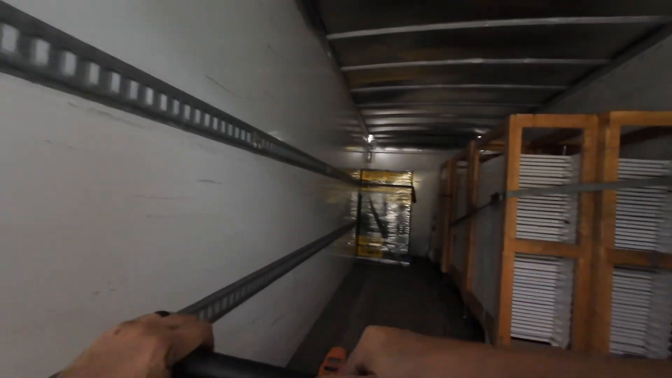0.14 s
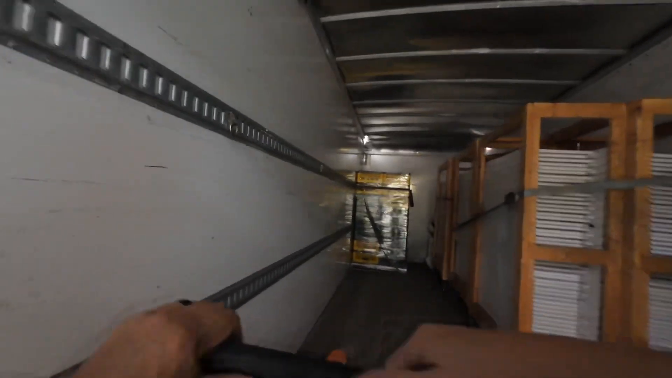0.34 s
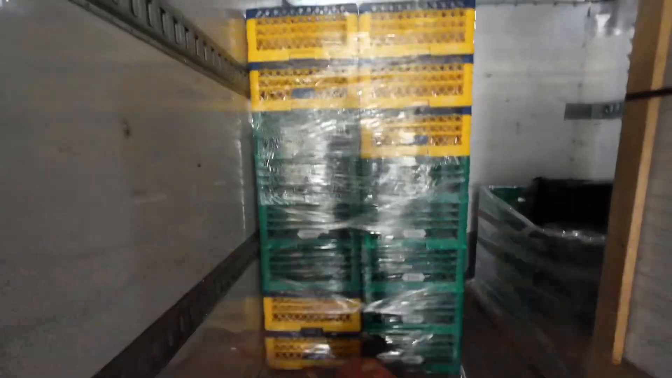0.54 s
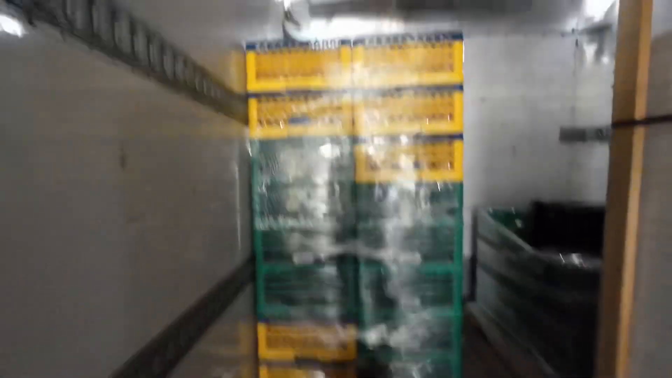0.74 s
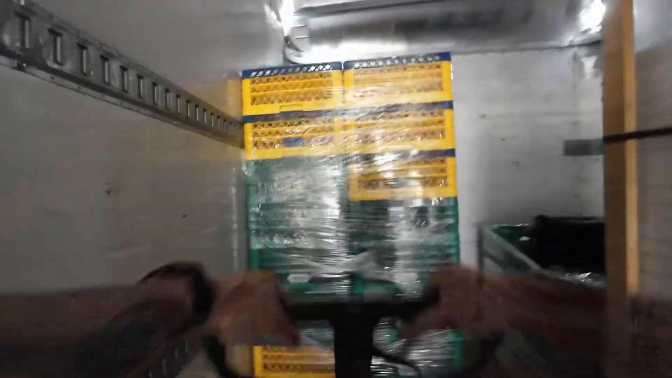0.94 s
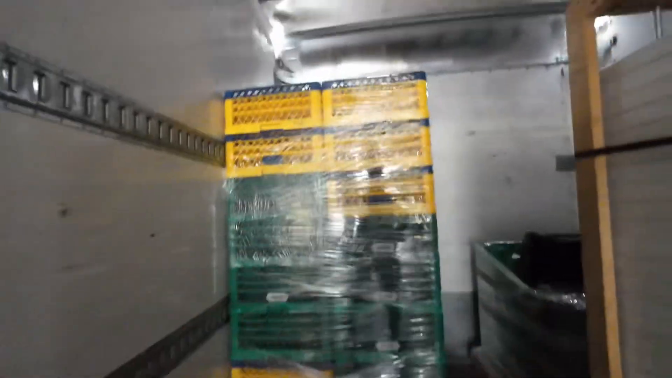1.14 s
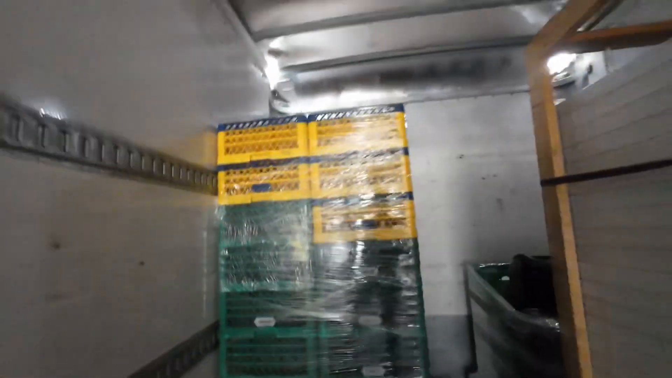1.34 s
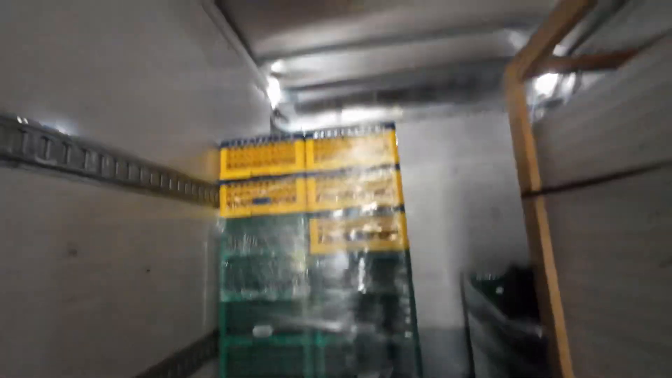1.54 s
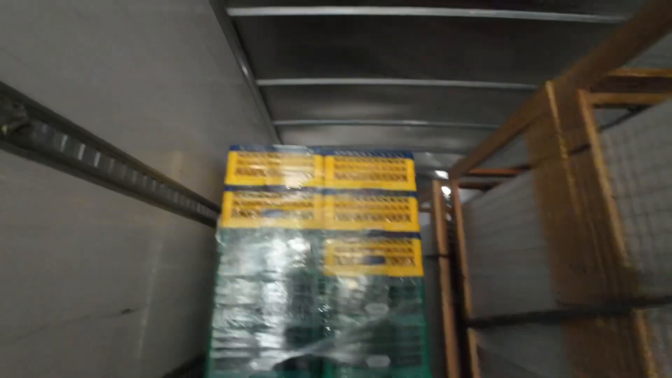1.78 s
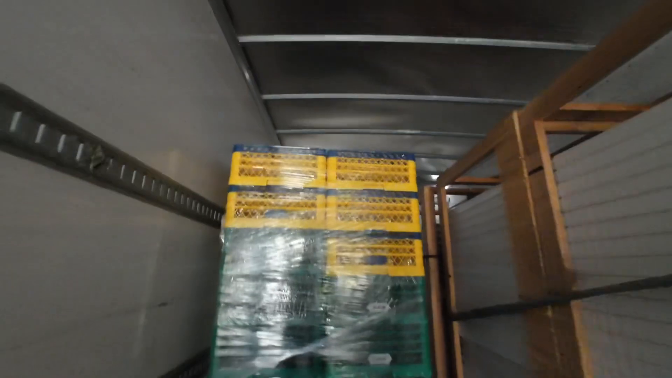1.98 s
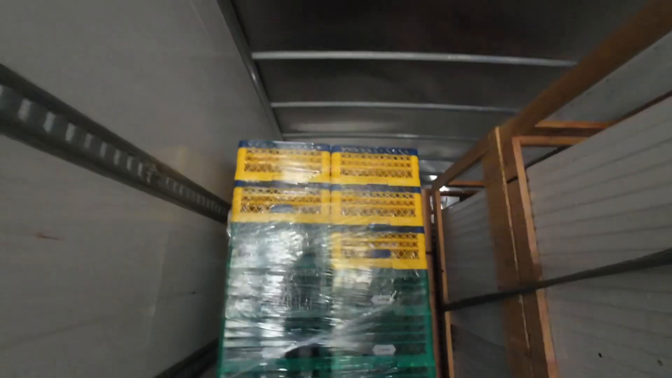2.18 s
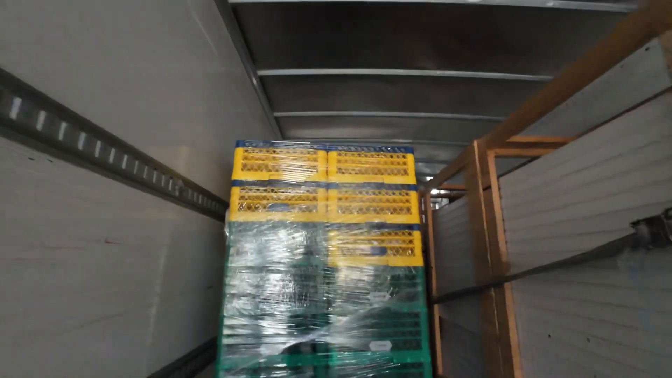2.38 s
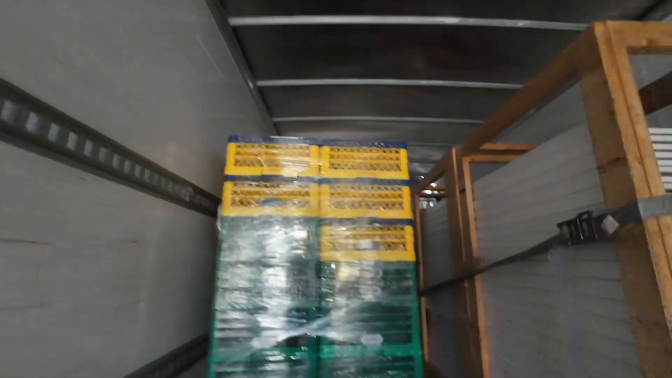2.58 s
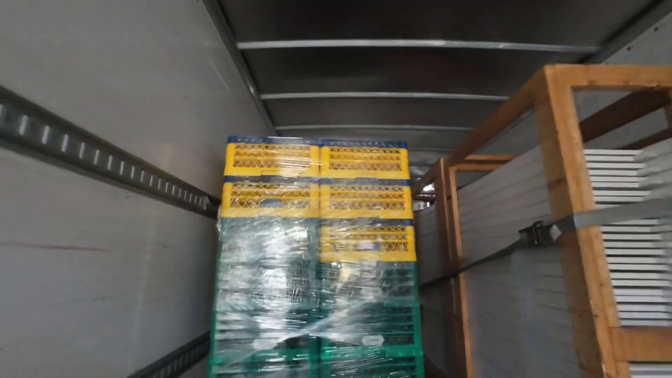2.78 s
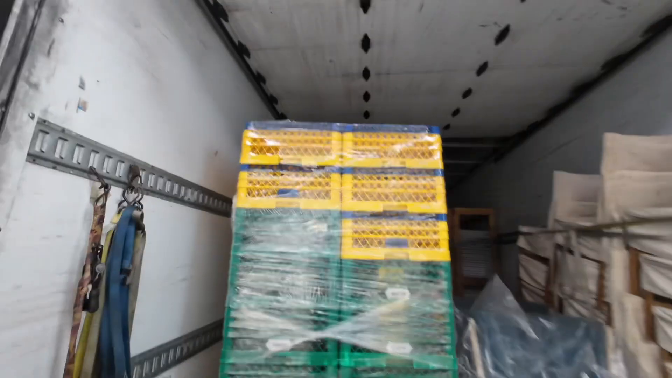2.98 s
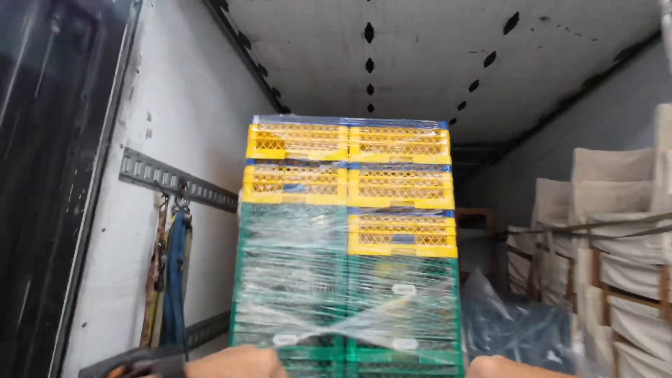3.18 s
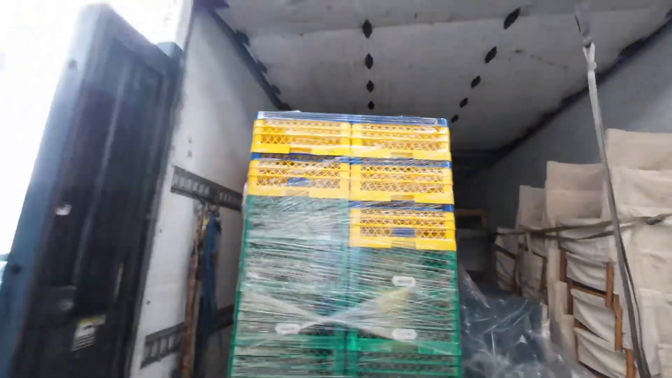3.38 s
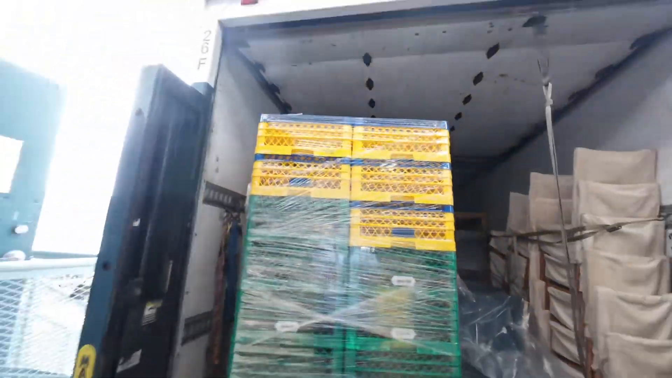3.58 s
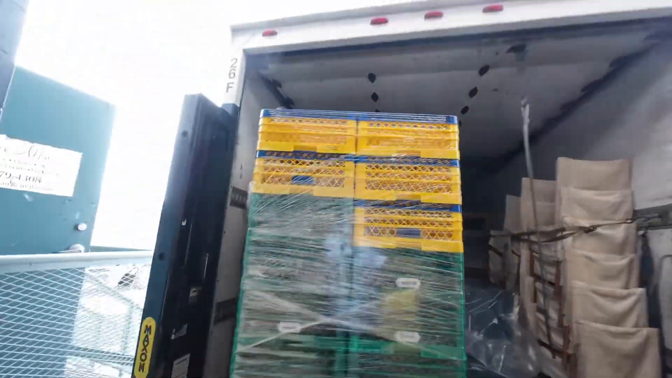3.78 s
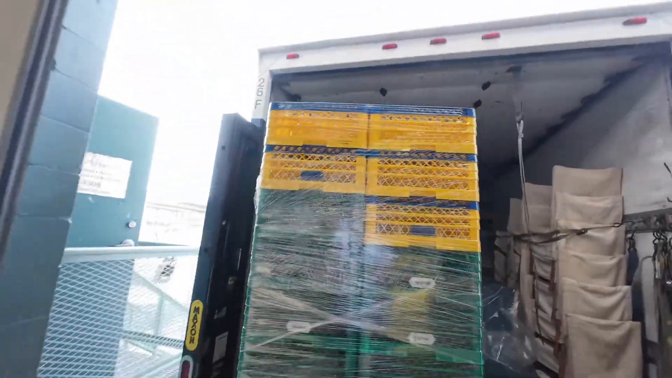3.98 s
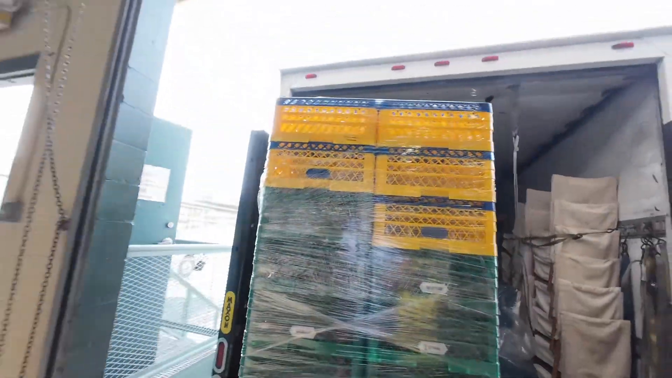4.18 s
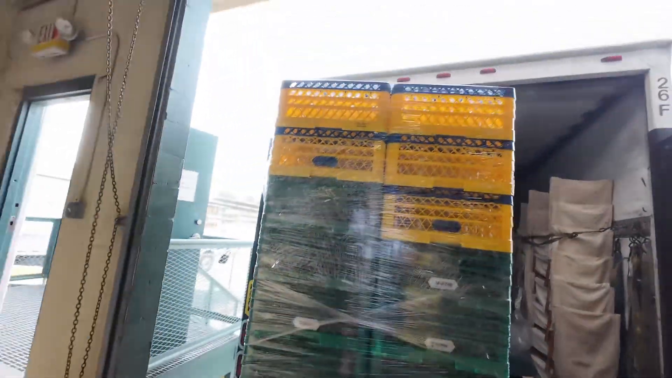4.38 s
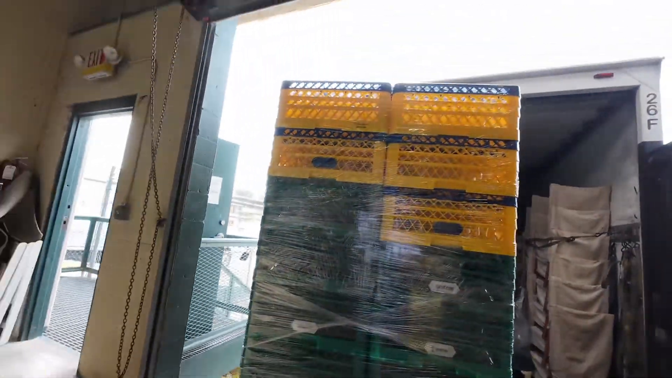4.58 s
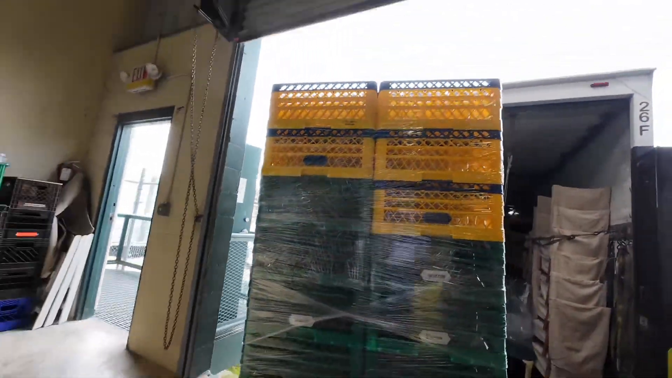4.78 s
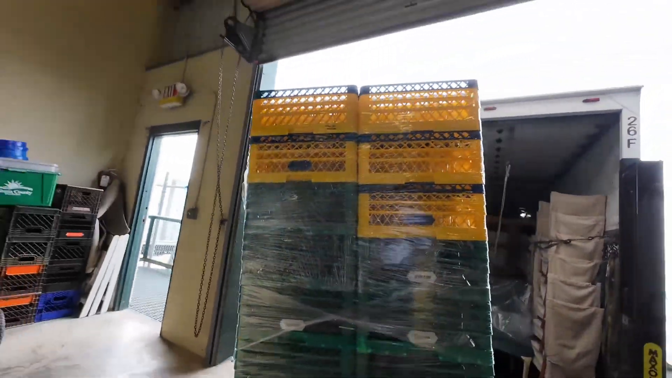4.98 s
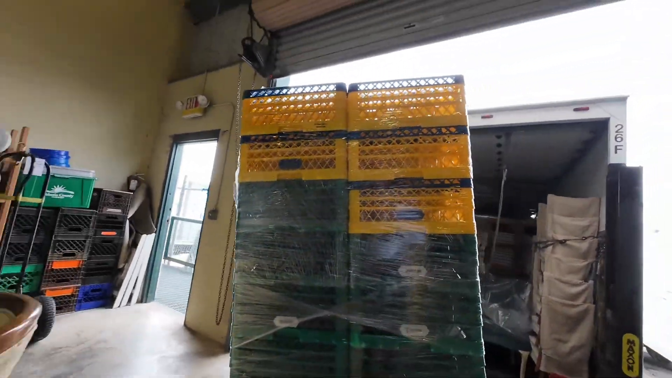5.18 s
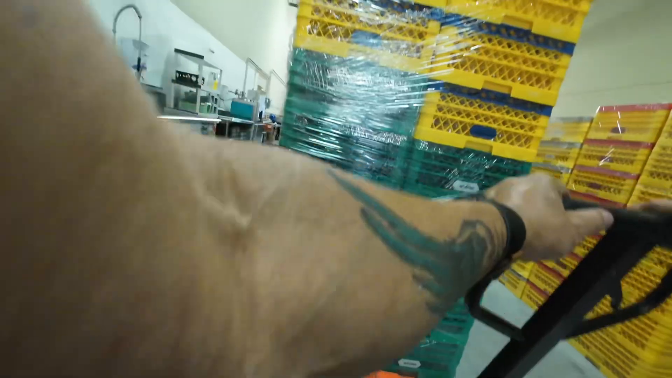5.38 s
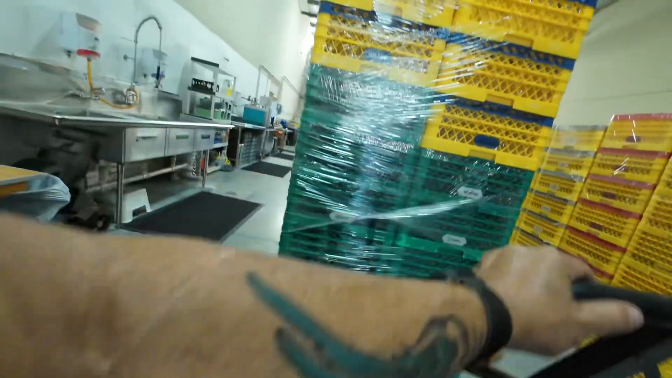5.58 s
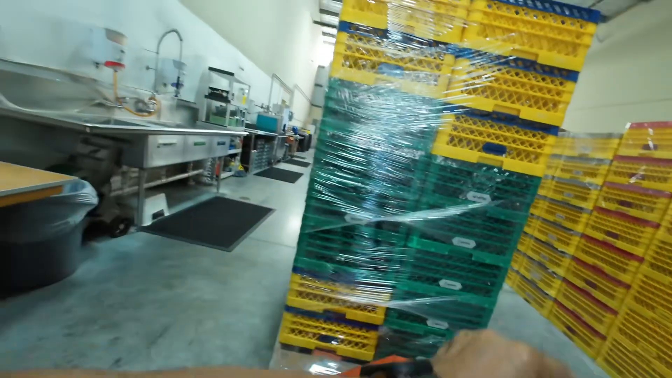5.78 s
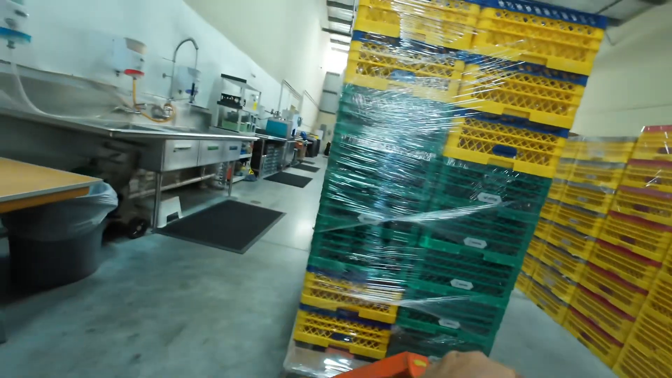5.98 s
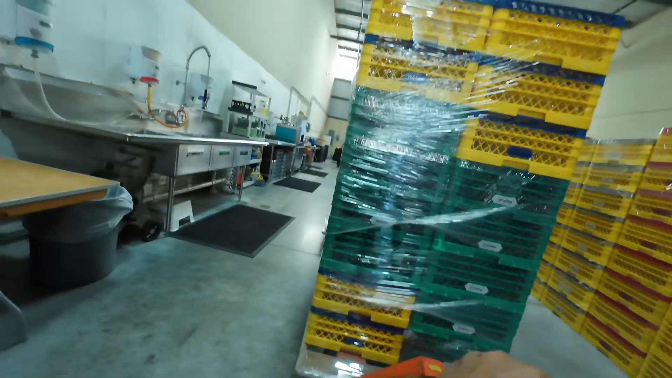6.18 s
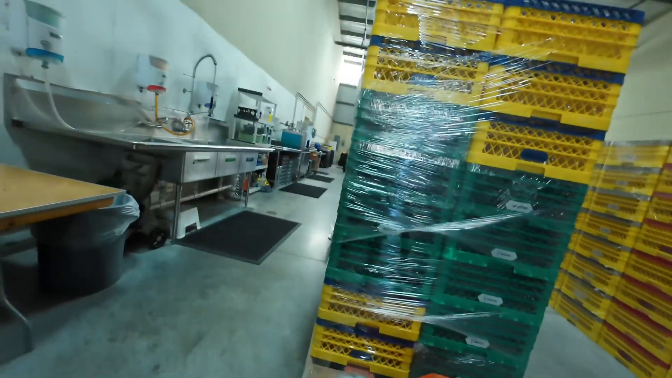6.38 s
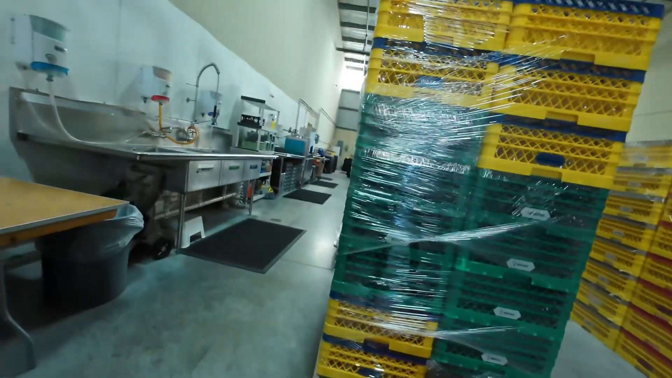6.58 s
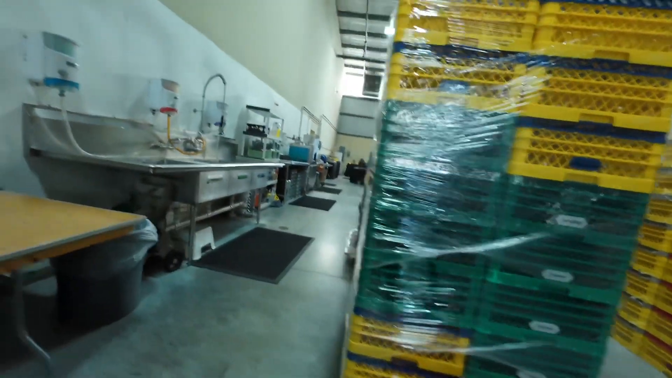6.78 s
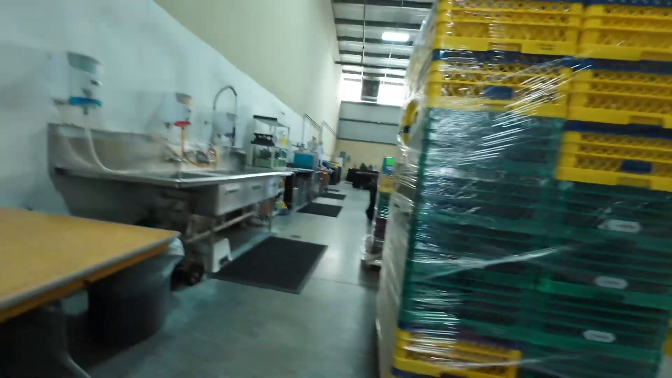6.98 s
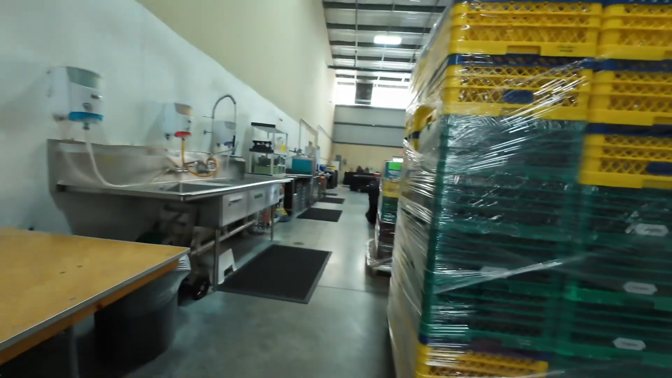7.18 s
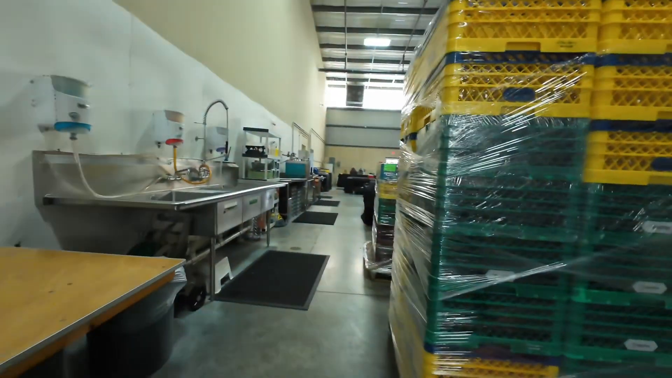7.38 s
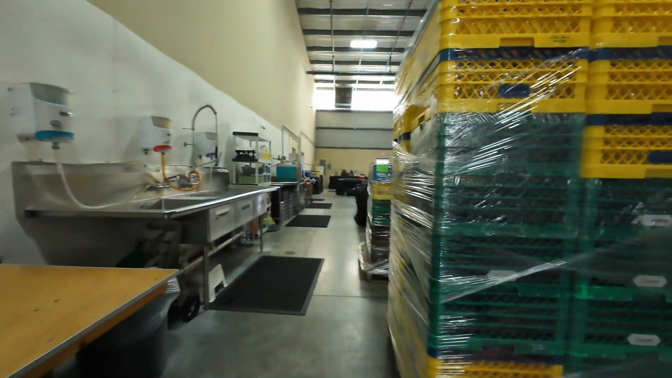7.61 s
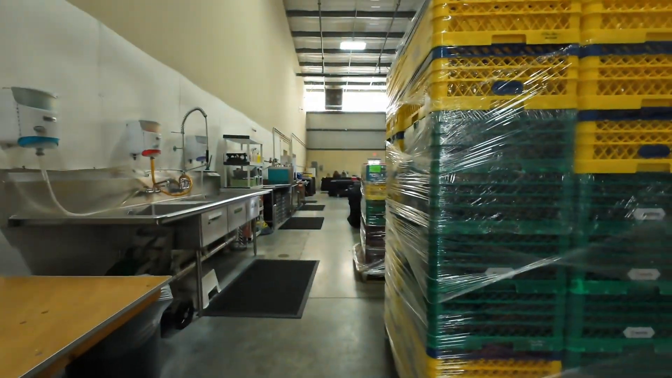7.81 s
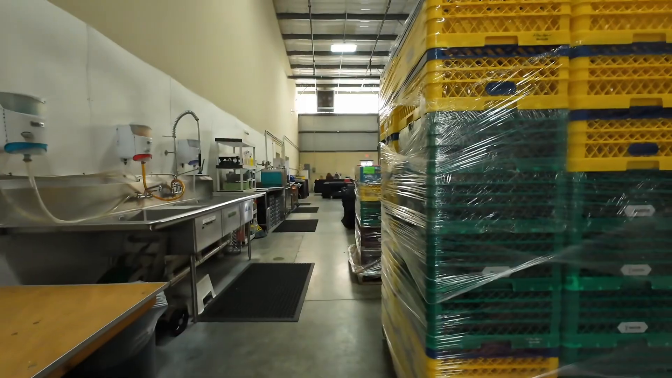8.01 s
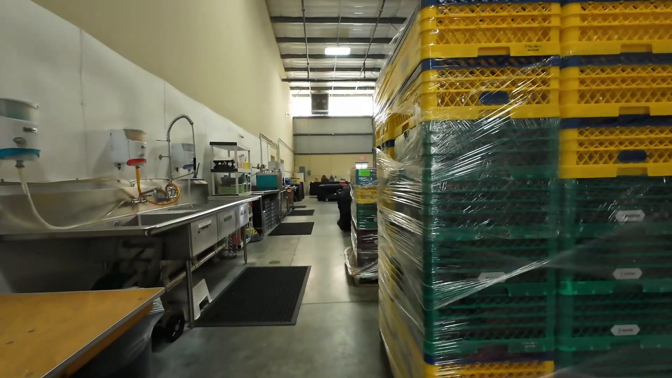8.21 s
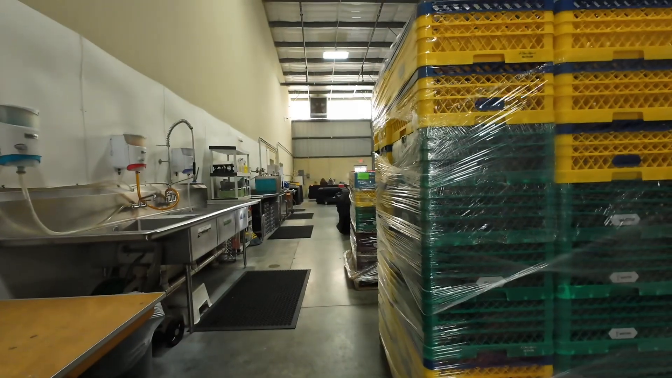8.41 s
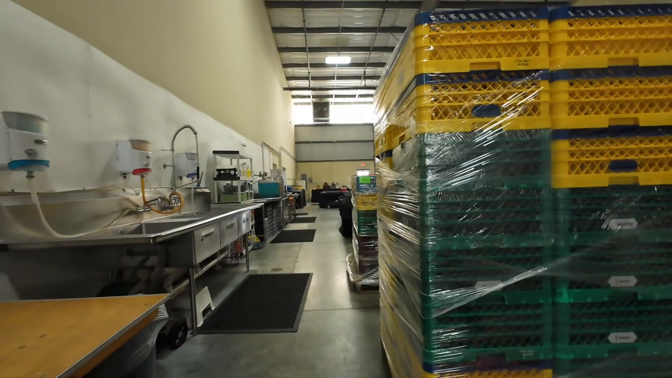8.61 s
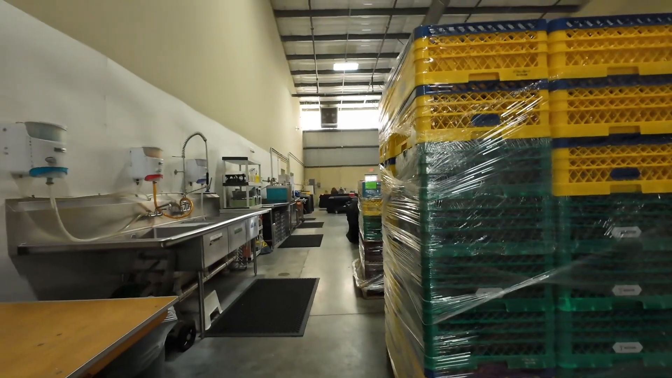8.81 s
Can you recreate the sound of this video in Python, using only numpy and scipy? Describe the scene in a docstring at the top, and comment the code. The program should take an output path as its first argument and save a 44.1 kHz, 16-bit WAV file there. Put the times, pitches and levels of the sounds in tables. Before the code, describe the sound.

Body-worn microphone, abrupt cuts between moments. Hollow wheel rumble and ringing steel inside a box truck, muffled thumps and shuffling, then a violent slam and heavy rattling roll across truck bed and dock plate, the treble dulling outside. The noise stops dead; in a roomy warehouse there are stretched plastic creaks, a low groan, cloth rustle, wind puffs, thin squeaks and closing clunks.

```python
"""Pallet jack from truck to warehouse

A manual pallet jack rumbles through a box truck, clanks under a pallet of wrapped plastic crates and
hauls it over the dock plate: shaped noise and random contacts roll, decaying noise and modes clank and thud.
In the quiet warehouse the load creaks by stick-slip, low noise buffets the microphone, gliding tones squeak
at the wheels and the jack knocks again over a soft ventilation drone."""
import sys
import numpy as np
from scipy import signal
from scipy.fft import rfft, irfft, next_fast_len
from scipy.io import wavfile
from scipy.ndimage import uniform_filter1d, map_coordinates

SR = 44100
rng = np.random.default_rng(int(sys.argv[2]) if len(sys.argv) > 2 else 0)


def unload_audio(sound):
    """Save the sound as a 16-bit wav file, at the path given as the first command line argument."""
    columns = np.transpose(np.atleast_2d(sound))
    # keep every value between -1 and 1, then stretch to whole-number steps
    steps = np.round(np.clip(columns, -1, 1) * 32767)
    wavfile.write(sys.argv[1], SR, steps.astype(np.int16))


N = 390285
TIME = np.arange(N) / SR
TOP_HZ = 15750  # top of the audible band

# moments at which the events still sounding are cut off: time [s]
CUTOFFS = [.42, 1.633, 2.982, 5.33]
# resonances of the jack's deck: (frequency [Hz], width [Hz], level [dB])
DECK = [(180.3, 41, 2), (285, 137, -0.5), (433, 59, 2), (489, 45, 1.5), (622, 74, -1.5), (739, 57, -6.5),
        (880, 273, -14.5)]
# colour of fine metallic jingling: (frequency [Hz], density [dB per Hz])
JINGLE = [(3530, -1.5), (6000, 0.5), (7180, -7.5), (7810, 0), (8940, -6), (9880, -1.5), (11000, -10.5),
          (13300, -3), (15600, -18)]
# how hard the wheels drum, running in empty: (time [s], effort [dB])
EMPTY_RUN = [(0.0, -14), (0.176, -15.5), (0.26, -18)]


def rolling():
    """Hard wheels drum on the floor and shake every loose part of the jack."""
    # colours of the floor, drumming and loose frame: (frequency [Hz], density [dB per Hz])
    floor_colour = [(11, -30), (18, 4.5), (45, 2.5), (81, 5.5), (110, -8.5), (150, -11.5), (200, -18),
                    (330, -120)]
    drum_colour = [(59, -40), (100, -1.5), (129, -1.5), (192, -2.5), (344, -2.5), (474, -7), (646, -21),
                   (962, -18.5), (1400, -23.5), (1820, -29), (3080, -120)]
    rattle_colour = [(470, -13), (800, 1), (1300, -9.5), (1630, -7), (3110, -9.5), (5240, -21.5),
                     (7200, -26), (8000, -50), (10400, -49.5), (17600, -120)]

    rumble, drum, rattle, jingle = shaking()
    floor = coloured(rng.standard_normal(N), floor_colour)

    bumps = ringing(contacts(rate=400, spread_db=2.5), t60=0.37, wet_db=-0.5)
    deck_ring = resonant(contacts(rate=500, spread_db=5.5), DECK)
    deck_ring = coloured(deck_ring, [(900, -21), (3500, -14), (9000, -32)])
    deck = unit(coloured(bumps, drum_colour) + amp(-3.5) * deck_ring)

    chatter = amp(1.3 * wobble(29.87))  # loose parts jump about in clusters
    knocks = knocking(rate=130, t60=.05)
    shakes = ringing(contacts(rate=190, spread_db=5.0), t60=0.3, wet_db=16.5)
    frame = coloured(knocks + shakes, rattle_colour)
    pins = coloured(ringing(contacts(rate=480, spread_db=9.0), t60=0.28, wet_db=8.0), JINGLE)
    return rumble * floor + drum * hollow_floor(deck) + chatter * (rattle * frame + jingle * pins)


def shaking():
    """Gains of rumble, drumming, rattle and jingle: they follow the effort, and jolts stir up all but drumming."""
    # hauling the load out: (time [s], effort [dB])
    loaded_run = [(1.65, -31.5), (1.76, -27), (1.85, -22), (1.97, -20.5), (2.18, -27.5), (2.4, -29.5),
                  (2.83, -23.5), (3.22, -27), (3.92, -16.5), (4.03, -21.5), (4.31, -18.5), (4.9, -22.5),
                  (5.19, -33.5), (5.3, -37)]
    # jolts to bed and loose parts: (time [s], sway [dB], frame rattle [dB], fine jingle [dB])
    jolts = [(0.0, -18.5, -31, -34), (0.21, -15, -29.5, -60), (1.77, -19.5, -17, -30.5),
             (1.9, -17.5, -24, -33.5), (2.07, -22.5, -53, -34.5), (2.56, -40, -28, -46),
             (2.72, -45, -37, -31), (2.985, -9, -83, -72), (3.28, -9, -32.5, -49), (3.37, -36, -27, -36),
             (3.44, -25, -25.5, -44), (3.861, -17.5, -21, -34), (4.28, -29, -20.5, -33.5),
             (4.814, -29.5, -21.5, -53), (5.284, -39, -53.5, -32.5)]
    # how each shaking builds up and settles: (rise [s], t60 [s])
    swaying = (0.031, 1.34)
    rattling = (0.011, 1.18)
    jingling = (0.018, 1.4)
    drum_db, rumble_db, rattle_db, jingle_db = 1, -2.5, -22, -29  # each layer over the effort

    empty = curve(EMPTY_RUN) * (TIME < CUTOFFS[0])
    loaded = curve(loaded_run) * ((TIME > CUTOFFS[1]) & (TIME < CUTOFFS[-1]))
    effort = amp(-4.5) * empty + loaded
    # only a loaded jack keeps the truck bed rumbling
    bed = loaded * amp(rumble_db) * distance_gain(fade_db_per_s=6)

    times, sway_jolts, rattle_jolts, jingle_jolts = np.transpose(jolts)
    rumble = np.hypot(bed, surges(times, sway_jolts, swaying))
    rattle = np.hypot(effort * amp(rattle_db), surges(times, rattle_jolts, rattling))
    jingle = np.hypot(effort * amp(jingle_db), surges(times, jingle_jolts, jingling))
    return rumble, effort * amp(drum_db), rattle, jingle


def knocking(rate, t60):
    """Loose things knock together at random, each contact with a click and short resonances of its own; rms 1."""
    # lowest and highest resonance of loose crates and fittings: (frequency [Hz], frequency [Hz])
    knock_range = (450, 5500)
    out, t = np.zeros(N), np.arange(SR // 12) / SR
    for when, strength, *modes in rng.random((int(rate * N / SR), 20)):
        hz = np.interp(modes, [0, 1], knock_range)[:, None]
        ring = np.sum(np.sin(2 * np.pi * hz * t), axis=0) * amp(-60 * t / t60)
        click = 4 * rng.standard_normal(len(t)) * amp(-60 * t / .02)
        onset = 1 - np.exp(-t / .0005)
        add(out, when * N / SR, amp(12 * strength) * (ring + click) * onset)
    return unit(out)


def hollow_floor(deck):
    """The truck bed and dock plate boom; on solid concrete the low drumming weakens."""
    boom = filtered(deck, lambda hz: 1 / (1 + (hz / 330) ** 6))
    return deck - 0.49 * on_concrete() * boom


def on_concrete():
    """0 on the truck bed and dock plate, 1 on the warehouse floor."""
    concrete_s, crossing_s = 4.9, 0.24  # start and length of the crossing
    return np.clip((TIME - concrete_s) / crossing_s, 0, 1)


def distance_gain(fade_db_per_s):
    """1 inside the truck, then fading as the jack moves away from it."""
    exit_s = 3.45
    return amp(-fade_db_per_s * np.maximum(TIME - exit_s, 0))


def leaving_truck(x):
    """The top treble is brightest between the close walls of the truck and dulls outside."""
    top = filtered(x, lambda hz: 1 - 1 / (1 + (hz / 11500) ** 16))
    return x - (0.5 - distance_gain(fade_db_per_s=9)) * top


def boards():
    """Bare wheels run over the truck's boards, which ring freely until the load weighs them down."""
    # bare boards with the empty jack on them: (frequency [Hz], width [Hz], level [dB])
    board_modes = [(167, 22, 6.5), (296, 19, 3.5), (426, 84, -4), (631, 28, 1.5), (730, 26, -6),
                   (1490, 290, -27)]
    ring = resonant(contacts(rate=600, spread_db=0), board_modes)
    return amp(-2.5) * curve(EMPTY_RUN) * (TIME < CUTOFFS[0]) * ring


def clanks():
    """Each blow cracks, rings the struck part and the steel frame, chatters on and leaves a slow tail."""
    # blows on the jack: (time [s], level [dB], relative treble [dB], pitch [Hz], t60 [s])
    blows = [(0.042, -22.5, -1, 1000, 0.074), (0.11, -11.5, -18.5, 1460, 0.5),
             (0.289, -10, -16.5, 1090, 0.48), (0.379, -10, -10.5, 3320, 0.13), (0.452, -34, -27, 1680, 0.2),
             (0.603, -14.5, -28, 1350, 0.3), (0.716, -27, -28, 2000, 0.14), (0.736, -27.5, -21, 4800, 0.18),
             (1.143, -14, -21.5, 2390, 0.18), (1.273, -33.5, -22, 1220, 0.24),
             (1.37, -37.5, -9, 4300, 0.035), (1.443, -36, -13, 4310, 0.033),
             (1.607, -18.5, -26, 1320, 0.41), (1.721, -16, -24, 2200, .1), (1.733, -4.5, -20.5, 2240, 0.24),
             (1.795, -5, -17, 1920, 0.04), (1.901, -9, -19, 2160, 0.21), (2.032, -14.5, -30.5, 1840, 0.16),
             (2.491, -30, -4.5, 1100, 0.22), (2.515, -28, -5, 1200, 0.32), (2.582, -15, -34, 2680, 0.097),
             (2.698, -12, -15, 2120, 0.35), (2.763, -17.5, -7, 1030, 0.3), (2.804, -21, -11.5, 3480, 0.22),
             (2.86, -18, -11, 1190, 0.12), (3.203, -22, -39, 2320, 0.17),
             (3.279, -16.5, -12.5, 1050, 0.047), (3.367, -6.5, -46, 1290, 0.38),
             (3.514, -11, -20.5, 2130, 0.75), (3.874, -14.5, -12.5, 1200, 0.19),
             (3.955, -13, -30, 1610, 0.27), (4.023, -22, -35, 1600, 0.048), (4.268, -5, -31, 2190, 0.3),
             (4.382, -14, -42, 1460, 1), (4.43, -12.5, -40, 2150, 0.3), (4.825, -15, -14.5, 1900, 0.18),
             (4.879, -8.5, -21.5, 1130, 0.73), (4.974, -7, -49, 1550, 0.14), (5.109, -23, -12, 5100, 0.71),
             (7.935, -32.5, -5.5, 3930, 0.056), (8.262, -11.5, -24, 3100, 0.13),
             (8.374, -13.5, -35, 1130, 0.053), (8.427, -33, -17, 1170, 0.19),
             (8.518, -20.5, -31, 1230, 0.067)]
    # modes of the steel frame: (frequency [Hz], mean level [dB], t60 [s])
    frame_modes = [(657, 0.5, 0.31), (1036, -15, 0.57), (1098, -8, 0.37), (1360, -14, 0.28),
                   (2220, -12.5, 0.35), (2500, -7.5, 0.17), (2945, -14, 0.2), (3550, -12, 0.2),
                   (4380, -7, 0.17), (8400, -17, 0.25)]
    # colour of clashing steel: (frequency [Hz], density [dB per Hz])
    steel_colour = [(290, -21.5), (500, 1.5), (969, -8.5), (1450, -7.5), (1880, -10), (4400, -14),
                    (8000, -30.5), (10400, -33), (17600, -120)]

    out, t = np.zeros(N), np.arange(SR // 2) / SR
    for s, db, treble_db, hz, t60 in blows:
        modes = np.zeros(len(t))
        for mode_hz, level, life in frame_modes:
            tone = np.sin(2 * np.pi * mode_hz * t + rng.uniform(0, 2 * np.pi))
            modes += amp(level + rng.normal(0, 3.9) - 60 * t / life) * tone
        # the frame rings freely only while the jack stands empty
        frame_db = -3 if CUTOFFS[0] < s < CUTOFFS[1] else -19

        chatter = ringing(contacts(rate=2500, spread_db=5, size=len(t)), t60=0.1, wet_db=3.5)
        struck_part = resonant(chatter, [(hz, hz * 0.21, 0)])
        clash = unit(coloured(chatter, steel_colour) + amp(-9.0) * struck_part)
        sizzle = amp(treble_db + 10.5) * coloured(rng.standard_normal(len(t)), JINGLE)
        decay = amp(-60 * t / max(t60, .02) + 1.1 * wobble(142.6, len(t)))
        decay = decay + amp(-16.5 - 60 * t / 0.8)  # slow tail

        crack = resonant(rng.standard_normal(len(t)), [(hz, hz * 0.39, 0), (3100, 1400, -4)])
        crack = coloured(crack, [(300, 2.0), (4000, 11), (4700, -10), (15000, -18)])
        hardness = amp(1.5 * (db + 5.5))  # only hard blows open with a strong crack
        blow = (clash + sizzle) * decay + hardness * crack * amp(-60 * t / 0.088) + amp(frame_db) * modes
        rise = 0.0005 if s < CUTOFFS[1] else 0.0022  # under load the parts meet one after another
        add(out, s, amp(db - 9.5) * blow * (1 - np.exp(-t / rise)))
    return out


def forks():
    """The long forks ring when the load slams onto them."""
    # modes: (frequency [Hz], mean level [dB])
    modes = [(805, -2.5), (1577, -8), (2159, -9), (2680, -6), (3025, -4.5), (3187, -4), (4300, -12),
             (11590, -15.5)]
    # blows: (time [s], level [dB])
    blows = [(1.737, -20.5), (1.797, -24), (1.901, -23)]
    return steel_ring(modes, blows, t60=0.57)


def linkage():
    """The handle linkage rings against its stop."""
    # modes: (frequency [Hz], mean level [dB])
    modes = [(3278, -1.5), (3953, -1.5)]
    # blows: (time [s], level [dB])
    blows = [(0.352, -21.5), (0.379, -19)]
    return steel_ring(modes, blows, t60=0.24)


def handle():
    """The handle tube rings as the jack comes to rest."""
    # modes: (frequency [Hz], mean level [dB])
    modes = [(1206, 0), (2708, -5), (4054, -6)]
    # blows: (time [s], level [dB])
    blows = [(8.262, -36)]
    return steel_ring(modes, blows, t60=0.57)


def steel_ring(modes, blows, t60):
    """A steel part rings on after each blow; its modes waver in phase, the high ones most."""
    out, t = np.zeros(N), np.arange(SR // 2) / SR
    for s, db in blows:
        ring = np.zeros(len(t))
        for hz, level in modes:
            waver = np.sqrt(hz / 4000) * wobble(60, len(t))
            ring += amp(level + rng.normal(0, 2)) * np.sin(2 * np.pi * (hz * t + rng.random()) + waver)
        add(out, s, ring * amp(db - 60 * t / t60) * (1 - np.exp(-t / .002)))
    return out


def thuds():
    """Wheels and pallet bump on the floor: a push and a dull knock that rings the deck, with a hollow tail."""
    # bumps: (time [s], level [dB], pitch [Hz], t60 [s])
    bumps = [(0.104, -8, 312, 1), (0.582, -11, 245, 0.34), (1.034, -15.5, 562, 0.047),
             (1.128, -11, 254, 0.16), (1.585, -15, 588, 0.18), (1.703, -11, 303, 0.41),
             (2.597, -8.5, 543, 0.094), (2.753, -4.5, 612, 0.11), (2.777, -6.5, 610, 0.98),
             (2.865, -8.5, 434, 0.17), (2.984, -12, 156, 0.27), (3.124, -9, 208, 1), (3.283, -3, 208, 1),
             (3.37, -9.5, 387, 0.17), (3.736, -8.5, 760, 0.12), (3.768, -10.5, 287.3, 0.43),
             (3.884, -13, 200, 0.26), (4.02, -7.5, 500, 0.067), (4.167, -4, 370, 0.32),
             (4.207, -4.5, 226, 0.25), (4.694, -8.5, 530, 0.59), (4.827, -6.5, 490, 0.78),
             (4.965, -8, 525, 0.4), (8.141, -24.5, 600, 0.064), (8.262, -7, 260, 0.09),
             (8.273, -10.5, 557, 0.098), (8.298, -10, 557, 0.083), (8.367, -18, 417, 0.2)]
    out, t = np.zeros(N), np.arange(SR // 2) / SR
    for s, db, hz, t60 in bumps:
        knock_colour = [(hz / 5, -24), (hz / 1.55, -6), (hz, 0), (hz * 1.09, -5), (hz * 1.82, -14),
                        (hz * 7, -38), (hz * 30, -70)]
        knock = coloured(rng.standard_normal(len(t)), knock_colour)
        deck = resonant(rng.standard_normal(len(t)), DECK)
        deck = coloured(deck, [(130, -5.5), (700, 2), (1500, -6.0), (6000, -2)])
        decay = amp(-60 * t / max(t60, .02)) + amp(-8.5 - 60 * t / 0.5)
        body = (knock + amp(-3.5) * deck) * decay * (1 - np.exp(-t / 0.00065))
        push = np.sin(2 * np.pi * hz * t) * amp(-60 * t / 0.056)
        add(out, s, amp(db) * (amp(-3.0) * body / np.abs(body).max() + amp(-4.0) * push))
    return out


def squeaks():
    """Stick-slip at wheels and axles: gliding, faltering tones with rasping overtones and scratch, in a room."""
    # squeaks: (time [s], length [s], start [Hz], middle [Hz], end [Hz], level [dB],
    #           step per overtone [dB], roughness [ratio])
    squeak_rows = [ (2.748, 0.13, 9600, 9680, 9800, -28, -20, 0.8),
                   (2.75, 0.15, 13200, 13300, 13400, -31.5, -18, 1.16),
                   (3.063, 0.062, 10100, 9760, 9800, -36.5, -20, 0),
                   (6.75, 0.055, 3270, 3300, 3480, -47, -10, 0.9),
                   (6.855, 0.12, 3400, 3490, 3320, -51, -9.5, 0.72),
                   (7.096, 0.1, 3200, 3220, 3500, -50.5, -6, 1.04),
                   (7.214, 0.019, 940, 1094, 1260, -38.5, -19, 0.13),
                   (7.813, 0.079, 3400, 3800, 3950, -44.5, -7.5, 0.4),
                   (7.887, 0.077, 4400, 4680, 4720, -40.5, -11, 0.22),
                   (7.928, 0.035, 4160, 3920, 3980, -39, -11, 0.5),
                   (7.967, 0.092, 4310, 4020, 4010, -34.5, -10.5, 0.28),
                   (8.111, 0.13, 4680, 4560, 4370, -43, -7, 0.7),
                   (8.146, 0.1, 662, 877, 840, -28, -5.5, 0.17),
                   (8.225, 0.025, 4720, 4700, 4470, -31, -7, 1.05)]
    out = np.zeros(N)
    for s, length, start_hz, middle_hz, end_hz, db, overtone_db, rough in squeak_rows:
        u = np.linspace(0, 1, int(length * SR))
        pitch = np.polyval(np.polyfit([0, .5, 1], [start_hz, middle_hz, end_hz], 2), u)
        jitter = .07 * wobble(middle_hz / 2, len(u)) + .02 * wobble(130, len(u))
        phase = 2 * np.pi * np.cumsum(pitch * (1 + rough * jitter)) / SR
        tone = np.sin(phase)
        for k in range(1, min(6, int(TOP_HZ / middle_hz))):  # each overtone flickers and rasps on its own
            rasp = 3 * rough * np.sqrt(k) * wobble(middle_hz / 4, len(u))
            flicker = amp(overtone_db * k + 3 * wobble(70, len(u)))
            tone = tone + flicker * np.sin((k + 1) * phase + rasp)
        grip = amp(5 * np.sqrt(abs(rough)) * wobble(200, len(u)))
        scratch_colour = [(800, -42), (3800, 15.0), (6000, 0), (8500, 0), (15000, -13.0)]
        scratch = coloured(rng.standard_normal(len(u)), scratch_colour)
        squeak = unit(tone * grip) + amp(-3) * rough * scratch
        add(out, s, amp(db) * squeak * np.sin(np.pi * u))
    return ringing(out, t60=.25, wet_db=-8)


def creaks():
    """Quick slips between the stacked crates excite their plastic walls; a slow slip makes them groan."""
    # slips: (time [s], level [dB], relative treble [dB], length [s])
    slip_rows = [(5.603, -32.5, -42, 0.041), (5.665, -16.5, -5.5, 0.023), (5.983, -28, -38, 0.032),
                 (6.023, -32, -29, 0.027), (6.06, -36, -31, 0.057), (6.132, -21.5, -32, 0.048),
                 (6.253, -20, -19, 0.05), (6.47, -19.5, -14, 0.03), (6.912, -28, -23, 0.039)]
    # the load groans as it is swung round: (time [s], level [dB], mean stick-slip rate [Hz])
    groan_rows = [(5.603, -30.5, 288), (5.67, -39, 276), (5.7, -38, 311.4), (5.79, -41, 297.8),
                  (5.835, -37.5, 313), (5.899, -39.5, 290.6), (6.11, -44, 281.3)]
    # resonances of the crates: (frequency [Hz], width [Hz], level [dB])
    crate_modes = [(484, 39, 1), (817, 73, -2.5), (1270, 190, -3.5), (1710, 115, -3), (2230, 130, -4.5),
                   (2740, 54, 1), (3460, 120, -7), (3730, 28, -6), (3890, 31, -8), (4310, 47, -7),
                   (4700, 91, -9), (5040, 29, -8.5), (5440, 57, -9.5)]
    # colour of rubbing plastic: (frequency [Hz], density [dB per Hz])
    plastic_colour = [(170, -33), (476, -5), (1360, -3), (2400, -2), (3150, -3), (9000, -26), (19800, -120)]

    slips, ticks, t = np.zeros(N), np.zeros(N), np.arange(SR // 3) / SR
    for s, db, treble_db, length in slip_rows:
        push = amp(db - 11.5) * (1 - np.exp(-t / 0.0038)) / (1 + (t / max(length, .005)) ** 3)
        add(slips, s, push)
        add(ticks, s, push * amp(treble_db))
    friction = contacts(rate=4100, spread_db=-2.5)
    body = resonant(contacts(rate=2300, spread_db=3.5), crate_modes)
    walls = unit(amp(-8) * coloured(friction, plastic_colour) + body)
    edge = coloured(rng.standard_normal(N), [(4000, -4), (8000, -2), (11000, -14), (15000, -28)])

    groan_s, groan_db, slip_hz = np.transpose(groan_rows)
    turns = np.cumsum(np.interp(TIME, groan_s, slip_hz) * (1 + .015 * wobble(200))) / SR
    catches = np.diff(np.floor(turns), prepend=0) * amp(2 * wobble(200))  # one uneven pulse a slip
    groan = resonant(catches, crate_modes) + unit(catches - catches.mean()) + .5 * body
    groan_colour = [(130, -19), (230, -16.0), (500, 7.5), (1500, 1.5), (3000, -12.0), (9000, -43)]
    groan = swell(groan_s, groan_db) * coloured(groan, groan_colour)
    return slips * walls + ticks * edge + amp(-4.0) * ringing(groan, t60=0.49, wet_db=-3)


def manoeuvring():
    """Slow moves: air bumps the microphone, feet shuffle, clothes rustle, the stretch wrap crinkles."""
    # colours of air, hard gusts, feet, cloth and wrap: (frequency [Hz], density [dB per Hz])
    air_colour = [(11, -19), (18, 4), (36, -1), (145, -16.5), (167, -23.5), (200, -23), (260, -55),
                  (440, -120)]
    gust_colour = [(24, -32), (40, -1), (76, -1), (248, -15.5), (593, -40), (900, -47), (1400, -120)]
    shuffle_colour = [(120, -53), (200, 1.5), (404, 1), (606, -1), (962, -6), (2000, -13), (2600, -29),
                      (4400, -120)]
    cloth_colour = [(710, -24), (1200, -6), (1800, -7), (3340, -2.5), (7270, -16), (10400, -53),
                    (17600, -120)]
    wrap_colour = [(4120, -36), (7000, -24), (7950, 3), (10200, 6), (11100, 0.5), (13300, 9), (15600, -4)]
    # hard buffets on the microphone: (middle [s], length [s], level [dB])
    buffet_rows = [(7.39, 0.2, -26.5), (7.49, 0.12, -23), (7.6, 0.14, -27), (7.76, 0.15, -23.5)]

    air, shuffle, rustle, crinkle = handling()
    draught = air * coloured(rng.standard_normal(N), air_colour)
    gust = humps(buffet_rows) * unit(amp(3.5 * wobble(45)))
    flutter = coloured(rng.standard_normal(N), [(60, -10), (250, 3), (600, -13), (1200, -45), (3000, -70)])
    push = coloured(rng.standard_normal(N), gust_colour)
    buffets = gust * (push + amp(9.5) * gust * flutter)  # stronger gusts are brighter
    feet = shuffle * coloured(ringing(rng.standard_normal(N), t60=0.66, wet_db=-0.5), shuffle_colour)
    cloth = rustle * coloured(rng.standard_normal(N), cloth_colour)
    crackle = ringing(contacts(rate=60, spread_db=5), t60=.06, wet_db=0)
    film = rng.standard_normal(N) + amp(-7) * crackle
    return draught + buffets + feet + cloth + crinkle * coloured(film, wrap_colour)


def handling():
    """Gains of air, shuffle, rustle and crinkle: the quiet of each place plus puffs and moves."""
    # steady background of each place: (air [dB], shuffling [dB], rustle [dB], crinkle [dB])
    truck_quiet = (-35, -50, -61.5, -74)
    warehouse_quiet = (-50, -56.5, -61, -74.5)
    # tugs and steps: (time [s], shuffling [dB], rustle of clothes [dB], crinkle of the wrap [dB])
    moves = [(0.71, -37.5, -68, -56), (0.98, -70, -50.5, -61), (1.15, -35.5, -58, -65),
             (1.31, -42, -52.5, -58.5), (1.52, -37.5, -53, -66), (5.67, -38, -46, -59),
             (5.81, -40.5, -61, -66), (6.49, -46.5, -48, -54.5), (6.7, -53, -52, -55.5),
             (7.21, -49, -50, -56), (7.95, -47, -41.5, -52), (8.13, -34, -37, -60),
             (8.3, -33, -38.5, -41.5), (8.48, -40, -50, -54), (8.7, -46, -54.5, -55)]
    # how each move starts and dies away: (rise [s], t60 [s])
    moving = (0.022, 1)
    # soft puffs of air past the microphone: (middle [s], length [s], level [dB])
    puffs = [(0.78, 0.19, -24), (1.38, 0.11, -28), (7.43, 0.31, -20.5), (7.76, 0.57, -27), (8.32, 0.1, -30),
             (8.45, 0.16, -28.5), (8.78, 0.39, -31)]

    in_truck = (TIME > CUTOFFS[0]) & (TIME < CUTOFFS[1])
    in_warehouse = TIME > CUTOFFS[-1]
    quiet = np.outer(amp(truck_quiet), in_truck) + np.outer(amp(warehouse_quiet), in_warehouse)
    times, *levels_db = np.transpose(moves)
    return np.hypot(quiet, [humps(puffs)] + [surges(times, db, moving) for db in levels_db])


def ventilation():
    """A soft drone of resonant noise fills the warehouse."""
    # drone: (frequency [Hz], width [Hz], level [dB])
    vent_modes = [(212.5, 16.4, 3.5), (326, 20, -3.5)]
    return amp(-54) * resonant(rng.standard_normal(N), vent_modes) * (TIME > CUTOFFS[-1])


def amp(db):
    """Decibels to gain."""
    return 10 ** (np.asarray(db) / 20)


def unit(x):
    """Scale to rms 1."""
    return x / np.sqrt(np.mean(x ** 2) + 1e-20)


def wobble(rate, size=N):
    """A smooth random curve, rate knots a second."""
    knots = rng.standard_normal(int(size * rate / SR) + 4)
    return map_coordinates(knots, [np.arange(size) * rate / SR])


def filtered(x, response):
    """x times a response of frequency."""
    m = next_fast_len(len(x) + SR // 4)
    return irfft(rfft(x, m) * response(np.fft.rfftfreq(m, 1 / SR)), m)[:len(x)]


def coloured(x, spectrum):
    """x through a (frequency [Hz], level [dB]) spectrum, at rms 1."""
    f, db = np.transpose(spectrum)
    return unit(filtered(x, lambda hz: amp(np.interp(np.log(hz + 1), np.log(f), db))))


def resonant(x, peaks):
    """x through (frequency [Hz], width [Hz], level [dB]) resonances of alternating sign, at rms 1."""
    def response(f):
        total = 0
        for k, (centre, width, db) in enumerate(peaks):
            damping = 1j * f * width
            total = total + (-1) ** k * amp(db) * damping / (centre * centre - f * f + damping)
        return total
    return unit(filtered(x, response))


def contacts(rate, spread_db, size=N):
    """Tiny random impacts of uneven strength, at rms 1."""
    hits = (rng.random(size) < rate / SR) * rng.choice([-1, 1], size)
    return unit(hits * amp(spread_db * np.minimum(rng.standard_normal(size), 2)))


def ringing(x, t60, wet_db):
    """x plus a dense ring of countless weak modes, drawn afresh every third of a second."""
    t = np.arange(SR // 3) / SR
    wet = np.zeros(len(x) + 2 * len(t))
    for start in range(0, len(x), len(t)):
        tail = rng.standard_normal(len(t)) * amp(-60 * t / t60)
        ring = signal.fftconvolve(x[start:start + len(t)], tail / np.linalg.norm(tail))
        wet[start:start + len(ring)] += ring
    return (x + amp(wet_db) * wet[:len(x)]) / np.hypot(1, amp(wet_db))


def curve(rows):
    """A gain curve through (time [s], level [dB]) rows."""
    s, db = np.transpose(rows)
    return amp(np.interp(TIME, s, db))


def swell(s, db):
    """A gain curve that is all but silent outside its points."""
    return uniform_filter1d(amp(np.interp(TIME, s, db, left=-120, right=-120)), size=256)


def surges(times, levels_db, shape):
    """A gain curve in which every event builds up and settles with the same (rise [s], t60 [s])."""
    power, t = np.zeros(N), np.arange(3 * SR // 2) / SR
    rise, t60 = shape
    envelope = (1 - np.exp(-t / rise)) * amp(-60 * t / t60)
    for s, db in zip(times, levels_db):
        add(power, max(s, 0), (amp(db) * envelope) ** 2)
    return np.sqrt(power)


def humps(rows):
    """A gain curve with one smooth hump for each (middle [s], length [s], level [dB]) row."""
    out = np.zeros(N)
    for s, length, db in rows:
        add(out, s - length / 2, amp(db) * np.hanning(int(length * SR)))
    return out


def add(out, s, sound):
    """Mix in a sound from s seconds up to the next cutoff."""
    start = round(s * SR)
    end = min([N, start + len(sound)] + [round(c * SR) for c in CUTOFFS if c > s])
    out[start:end] += sound[:end - start]


def scene():
    """All sources at one microphone."""
    steel = forks() + linkage() + handle()
    jack = leaving_truck(rolling()) + boards() + clanks() + steel + thuds() + squeaks()
    return (jack + creaks() + manoeuvring() + ventilation())[None]


def record(dry):
    """The loudest peaks are rounded off and the top of the band is cut."""
    rounded = dry[0] / (1 + np.abs(dry[0] / .75) ** 6) ** (1 / 6)
    return filtered(rounded, lambda hz: hz < TOP_HZ)[None]


dry = scene()
out = record(dry)
unload_audio(out)
```